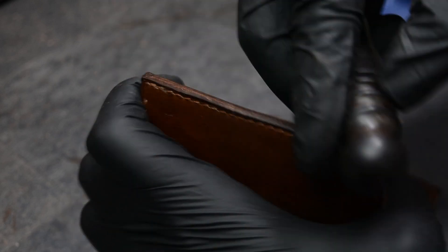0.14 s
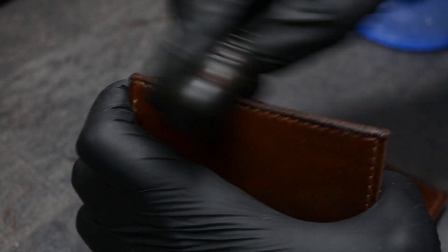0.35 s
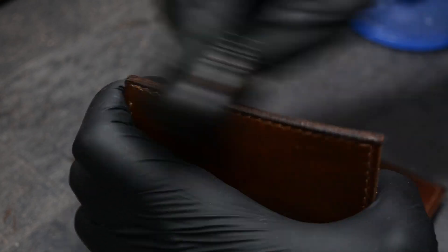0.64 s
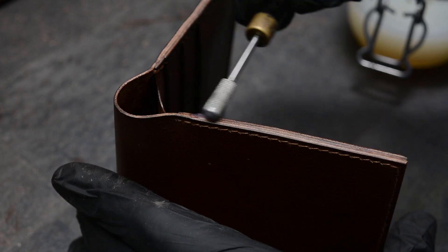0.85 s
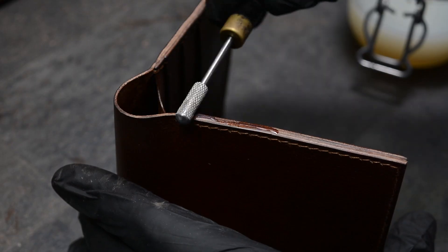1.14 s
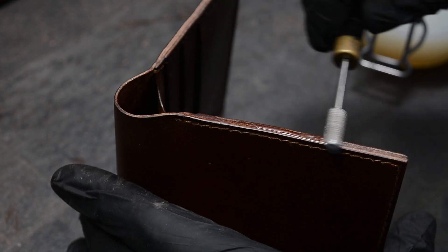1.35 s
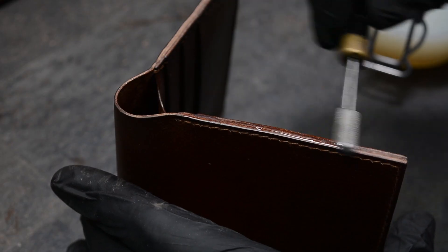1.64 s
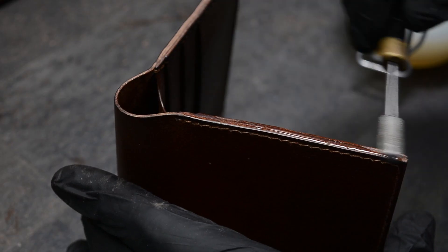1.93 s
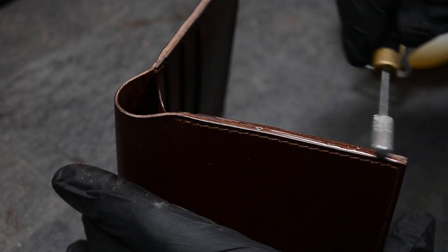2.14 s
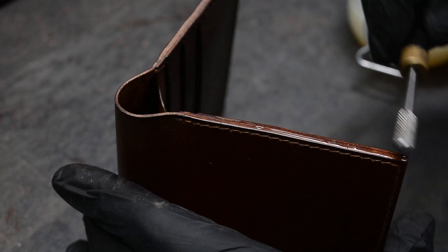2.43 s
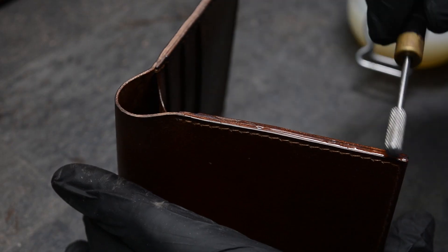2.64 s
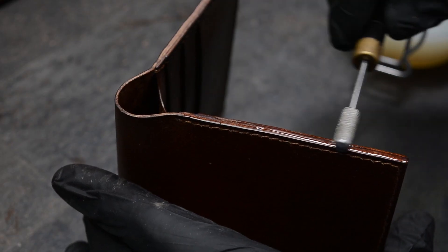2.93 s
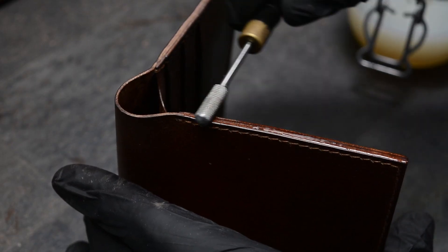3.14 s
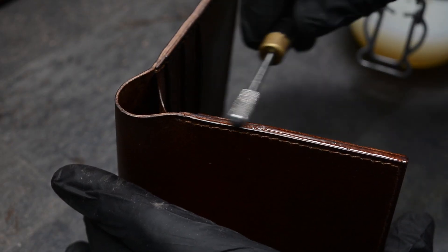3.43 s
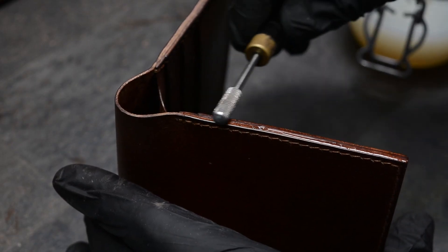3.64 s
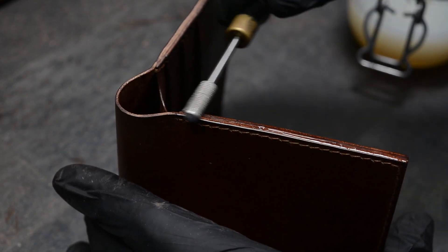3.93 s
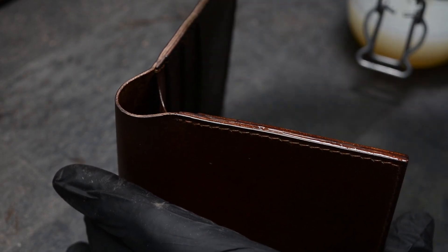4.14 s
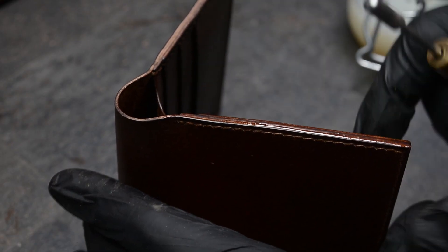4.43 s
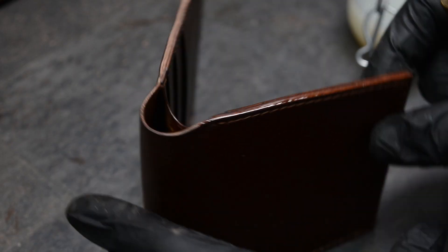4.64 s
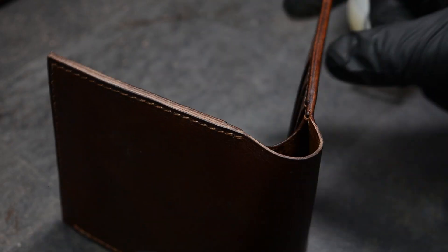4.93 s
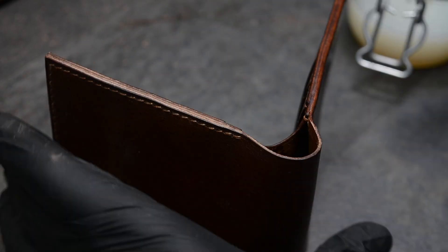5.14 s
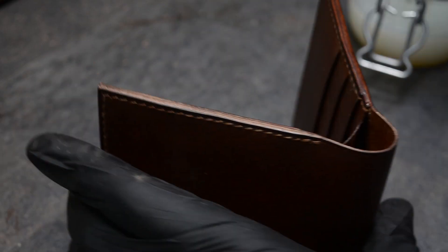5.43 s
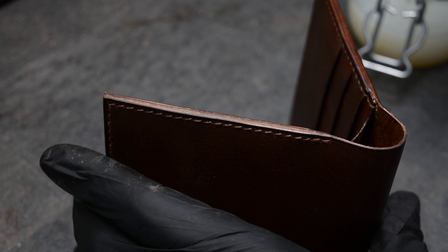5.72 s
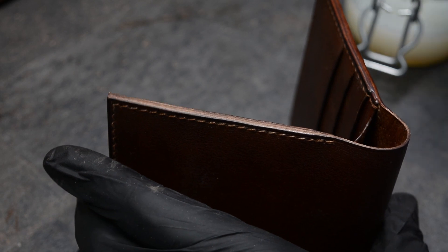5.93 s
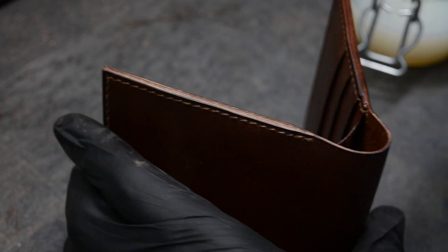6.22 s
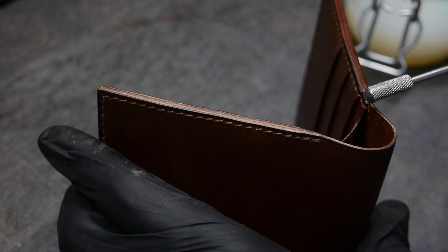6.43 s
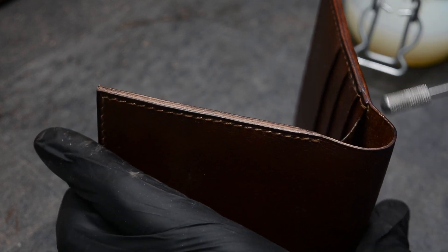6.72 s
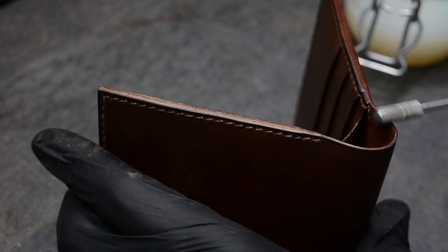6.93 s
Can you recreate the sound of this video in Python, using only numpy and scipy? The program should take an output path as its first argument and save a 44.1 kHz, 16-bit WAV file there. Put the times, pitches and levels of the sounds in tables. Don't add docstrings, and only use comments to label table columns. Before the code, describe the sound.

A wooden tool rubs a leather edge in rapid back-and-forth scratchy strokes, stopping abruptly after less than a second. Low bench thumps and soft taps of a small metal roller follow. Midway the leather is turned with crackly creases, slides and glove creaks. Then two very loud, bright metallic clicks come close together, followed by faint rustling. Close stereo microphones in a quiet, dry room with slight hiss.

```python
import sys
import numpy as np
from scipy import signal
from scipy.fft import rfft, irfft, next_fast_len
from scipy.io import wavfile

SR = 44100
rng = np.random.default_rng(int(sys.argv[2]) if len(sys.argv) > 2 else 0)


def attenuation_scalar(level_db):
    decades = np.asarray(level_db, float) / 20
    return 10 ** decades


def wav_out(sig):
    wavfile.write(sys.argv[1], SR, np.round(np.clip(np.atleast_2d(sig).T, -1, 1) * 32767).astype(np.int16))


N = 312669
TIME = np.arange(N) / SR


def rms_one(x):
    return x / np.sqrt(np.mean(x ** 2) + 1e-20)


def noise():
    return rng.standard_normal((2, N))


def gains(rows):
    s, db = np.transpose(rows)
    return attenuation_scalar(np.interp(TIME, s, db)) * (TIME < s[-1])


def swells(rows):
    coarse = TIME[::32]
    power = 1e-20
    for s, db, rise, fall in rows:
        late = coarse - s
        times_passed = np.where(late < 0, -late / max(rise, .003), late / max(fall, .003))
        power = power + attenuation_scalar(2 * (db - 12 * times_passed))
    return np.interp(TIME, coarse, np.sqrt(power))


def bump_shape(ms, rise_ms, fall_ms):
    return np.exp(-(ms / np.where(ms < 0, rise_ms, fall_ms)) ** 2)


def drift(rate_hz):
    r = np.exp(-2 * np.pi * rate_hz / SR)
    wander = signal.lfilter([1], [1, -2 * r, r * r], rng.standard_normal((2, N + SR)))
    return rms_one(wander[:, SR:])


def coloured(x, spectrum):
    size = next_fast_len(x.shape[-1])
    hz, db = np.transpose(spectrum)
    bins_hz = np.arange(size // 2 + 1) * SR / size
    curve = np.interp(np.log(bins_hz + 1), np.log(hz), db, left=-90, right=-90)
    return irfft(rfft(x, size) * attenuation_scalar(curve), size)[..., :x.shape[-1]]


def resonator(x, hz, r):
    return signal.lfilter([1, 0, -1], [1, -2 * r * np.cos(2 * np.pi * hz / SR), r * r], x)


def resonant(x, peaks):
    out = 0
    for k, (hz, width, db) in enumerate(peaks):
        r = np.exp(-np.pi * max(width, 10) / SR)
        out = out + (-1) ** k * attenuation_scalar(db) * (1 - r) * resonator(x, hz, r)
    return out


def friction(per_s, spread_db):
    sizes = attenuation_scalar(spread_db * np.minimum(rng.exponential(size=(2, N)), 5))
    signs = rng.choice([-1, 1], (2, N))
    return sizes * signs * (rng.random((2, N)) < per_s / SR)


def contact(size, at, rise_ms, fall_ms):
    ms = (np.arange(size) - at) * 1000 / SR
    swell = np.exp(np.where(ms < 0, ms / max(rise_ms, .1), -ms / max(fall_ms, .1)))
    return rng.standard_normal((2, size)) * swell


def peak_one(x):
    return x / np.abs(x).max()


def struck(force, modes):
    out = 0
    for hz, db, t60 in modes:
        soft = signal.lfilter(*signal.butter(1, min(1.5 * hz, .4 * SR), fs=SR), force)
        ring = resonator(soft, hz, attenuation_scalar(-60 / (t60 * SR)))
        strength = attenuation_scalar(db + 2.8 * rng.standard_normal((2, 1)))
        out = out + strength * ring / np.abs(ring).max(axis=1, keepdims=True)
    return peak_one(out)


def add(track, sound, s):
    i = round(s * SR)
    track[:, i:i + sound.shape[1]] += sound[:, :N - i]


def knocks(table, near_db, far_db):
    out = np.zeros((2, N))
    neighbours = ((.65, far_db), (.84, near_db), (1.16, near_db), (1.4, far_db))
    for s, db, hz, blur_ms, t60 in table:
        force = contact(SR // 5, SR // 25, 0.8 * blur_ms, blur_ms)
        others = [(ratio * hz, side_db, .55 * t60) for ratio, side_db in neighbours]
        add(out, attenuation_scalar(db) * struck(force, [(hz, 0, t60)] + others), max(s - .04, 0))
    return out


def room():
    # pitch in Hz, level in dB per Hz.
    tone = [(12, -33), (20, -10), (53, -8.5), (96, -7), (179, -6.5), (289, -5.5), (452, -5.5),
            (4660, -17.5), (14700, -22), (16500, -21)]
    level_db = -60
    return attenuation_scalar(level_db + 2.5 + .5 * drift(3)) * rms_one(coloured(noise(), tone))


def slicker():
    # time in seconds, level of the leather in dB.
    strokes = [
        (0.0, -59),
        (0.33, -60),
        (0.494, -57),
        (0.588, -57.5),
        (0.708, -54.5),
        (0.78, -68),
    ]
    # pitch in Hz, width in Hz, level in dB.
    wallet = [(700, 770, -8.5), (1270, 430, -5), (1640, 210, -2), (2400, 700, -10), (3200, 850, -13)]
    # pitch in Hz, level in dB per Hz.
    scratch_tone = [(2000, -7), (3000, -0.5), (5000, -2), (8000, -3.5), (12000, -6), (16000, -17)]
    # time in seconds, level in dB.
    swishes = [(.0, -61), (.052, -55), (.135, -52), (.21, -51.5), (.29, -55.5), (.36, -52.5), (.44, -57),
               (.52, -50), (.60, -54), (.668, -45.5), (.722, -42)]
    # time in seconds, peak in dB, pitch in Hz.
    turns = [(0.0094, -45, 1540), (0.0444, -54, 1670), (0.0997, -35.5, 1670), (0.1388, -40, 1720),
             (0.1994, -53.5, 1750), (0.251, -42.5, 1420), (0.2855, -39, 1300), (0.3336, -47, 1630),
             (0.385, -52, 1730), (0.4402, -35, 1705), (0.485, -43.5, 1540), (0.5294, -57, 1400),
             (0.6, -44.5, 1520), (0.6444, -51, 1740), (0.6931, -43, 1680)]

    pressure = gains(strokes)
    body = attenuation_scalar(-0.5 + 3.2 * drift(35)) * pressure * rms_one(resonant(friction(5000, spread_db=3.2), wallet))

    scratch_gain = pressure * attenuation_scalar(-8.5)
    for s, db in swishes:
        scratch_gain = scratch_gain + attenuation_scalar(db - 10.0) * bump_shape((TIME - s) * 1000, rise_ms=14.0, fall_ms=12.0)
    grit = rms_one(coloured(friction(9000, spread_db=3.0), scratch_tone))
    scratch = attenuation_scalar(-2.0) * scratch_gain * attenuation_scalar(3.1 * drift(30)) * grit

    blows = [(s, db, hz, 4.3 + .08 * (db + 45), .036) for s, db, hz in turns]
    turning = np.roll(knocks(blows, near_db=-7.5, far_db=-17.0), round(.003 * SR), axis=1)
    return body + scratch + turning


def bench():
    # pitch in Hz, width in Hz, level in dB.
    top_modes = [(145, 46, -2), (178, 48, 0), (215, 62, -5)]
    # time in seconds, level in dB, dying time in seconds.
    top_jolts = [(0.0, -60, .3), (.5, -60, .25), (.72, -59, .12), (.94, -59, .1), (1.3, -63, .3),
                 (1.66, -56, .08), (1.92, -58, .16), (2.2, -58, .1), (2.39, -60, .05), (2.53, -49.5, .05),
                 (2.69, -55, .05), (2.865, -54, .17), (3.16, -61, .15), (3.47, -56, .12), (3.83, -56, .05),
                 (4.03, -61, .05), (4.7, -54, .07), (4.82, -60, .08), (5.4, -63, .3), (6.69, -62, .08),
                 (7.07, -61, .1)]
    # time in seconds, level in dB, dying time in seconds.
    frame_jolts = [(.08, -57.5, .6), (.6, -63, .3), (1.38, -61, .08), (1.62, -58, .05), (1.78, -63, .04),
                   (2.07, -58, .12), (2.41, -63, .08), (3.69, -57, .05), (3.78, -55, .03), (4.11, -54, .05),
                   (4.35, -60, .07), (4.7, -58, .04), (5.03, -57, .05), (5.6, -66, .8), (6.68, -62, .07),
                   (7.03, -57, .04)]

    top_swell = swells([(s, db, .05, fall) for s, db, fall in top_jolts])
    frame_swell = swells([(s, db, .07, fall) for s, db, fall in frame_jolts])
    top = np.hypot(attenuation_scalar(-67.5), attenuation_scalar(-4.5) * top_swell)
    frame = np.hypot(attenuation_scalar(-74), frame_swell)
    hum = rms_one(resonant(noise(), top_modes))
    rumble = rms_one(coloured(noise(), [(18, -17), (40, 3.5), (70, -2), (120, -6)]))
    return attenuation_scalar(-1.0) * top * hum + attenuation_scalar(-4.0) * frame * rumble


def creases():
    # time in seconds, level in dB, pitch in Hz.
    folds = [(.905, -52, 1500), (1.25, -54, 1500), (1.29, -52, 1500), (1.35, -55, 1400), (2.21, -51, 2700),
             (2.218, -50, 1100), (2.248, -50, 1100), (3.6, -54, 1200), (4.656, -47, 1380),
             (4.683, -47, 990), (4.695, -43, 1320), (4.707, -44, 1350), (4.715, -46, 990),
             (4.729, -48, 940), (4.748, -47, 1740), (4.756, -53, 3910), (4.76, -50, 2200),
             (4.773, -43, 1160), (4.775, -48, 2260), (4.782, -44, 520), (4.785, -45, 1350),
             (4.802, -45, 1160), (4.806, -50, 2810), (4.813, -44, 550), (4.831, -48, 1740),
             (4.837, -47, 1240), (4.925, -53, 3200), (4.961, -47, 2500), (4.964, -47, 3970),
             (4.972, -52, 3220), (5.01, -54, 2800), (5.137, -54, 5200), (5.192, -56, 4500)]
    # time in seconds, level in dB, pitch in Hz.
    catches = [(.005, -52, 3200), (.145, -52, 2650), (.196, -52, 3300), (.254, -47, 2250),
               (.287, -47, 2240), (.308, -49, 2200), (.34, -49, 2650), (.451, -49, 2170), (.526, -55, 6430),
               (.531, -56, 4670), (.6, -55, 4500), (.655, -55, 6280), (.681, -51, 6210), (.724, -48, 5100)]
    blur_ms, t60_s = 2.2, .02
    snaps = [(s, db, hz, blur_ms, t60_s) for s, db, hz in folds + catches]
    return attenuation_scalar(4.5) * knocks(snaps, near_db=-10.0, far_db=-17.0)


def thumps():
    # time in seconds, left level in dB, pitch in Hz.
    in_step = [(.021, -57, 147), (.712, -54, 143), (.94, -58, 220), (1.624, -54, 224), (1.692, -55, 176),
               (1.696, -60, 279), (1.929, -53, 176), (2.188, -53, 217), (2.523, -49, 176),
               (2.693, -54, 180), (2.68, -63, 279), (2.875, -48, 176), (2.981, -50, 173), (3.168, -54, 169),
               (3.27, -58, 195), (3.477, -55, 228), (3.498, -53, 173), (3.647, -56, 125), (3.736, -59, 224),
               (3.825, -52, 125), (4.03, -58, 140), (4.23, -58, 192), (4.681, -50, 180), (4.94, -59, 170),
               (7.03, -57, 146)]
    # time in seconds, left level in dB, pitch in Hz.
    heaves = [(.153, -58, 50), (.232, -58, 55), (.334, -58, 41), (.59, -58, 55), (1.36, -58, 50),
              (1.45, -60, 75), (1.66, -58, 60), (2.06, -58, 65), (2.15, -59, 60), (2.4, -59, 60),
              (3.0, -60, 70), (3.55, -57, 125), (3.776, -57, 55), (4.121, -57, 80), (4.342, -58, 41),
              (4.7, -58, 60), (5.03, -57, 60), (6.009, -60, 35), (6.695, -58, 36), (7.02, -59, 50)]
    # time in seconds, left level in dB, pitch in Hz.
    opposed = [(.187, -60, 110), (.555, -54, 143), (.903, -46, 173), (1.259, -46, 176), (1.29, -60, 270),
               (2.15, -52, 176), (2.26, -54, 176), (2.37, -61, 283), (2.387, -49, 173), (2.93, -54, 176),
               (3.727, -56, 176), (4.817, -56, 118), (4.834, -52, 180), (5.173, -60, 220),
               (5.267, -55, 180)]
    # pitch in Hz, level in dB.
    right = [(60, -1), (120, -3), (176, -5), (225, -4), (280, 4)]

    out = np.zeros((2, N))
    ms = np.arange(-SR // 10, SR // 10) * 1000 / SR
    swell = bump_shape(ms, rise_ms=18.0, fall_ms=23.0)
    right_hz, right_db = np.transpose(right)
    for table, sign in ((in_step + heaves, 1), (opposed, -1)):
        for s, db, hz in table:
            note = attenuation_scalar(db + 2.5) * swell * np.sin(2 * np.pi * hz * ms / 1000)
            early = max(round((.1 - s) * SR), 0)
            sides = [1, sign * attenuation_scalar(np.interp(hz, right_hz, right_db))]
            add(out, np.outer(sides, note[early:]), max(s - .1, 0))
    return out


def hands():
    # peak in seconds, level in dB, swelling and dying times in seconds.
    slides = [(.95, -60, .1, .04), (1.158, -60, .02, .015), (1.25, -61, .04, .25), (1.658, -58.5, .03, .03),
              (3.984, -68, .08, .4), (4.32, -63, .04, .13), (4.685, -57, .07, .2), (4.785, -49.5, .18, .17),
              (5.258, -58, .01, .08), (5.48, -59, .4, .05), (5.95, -64, .03, .2), (6.14, -58.5, .3, .05),
              (6.282, -59, .12, .05), (6.676, -63, .01, .05)]
    # peak in seconds, creak in dB, hiss in dB, swelling and dying times in seconds.
    rustles = [(1.654, -68, -75, .015, .06), (3.24, -63, -68, .015, .02), (4.18, -68, -66, .1, .1),
               (4.29, -61, -66, .04, .1), (4.344, -56, -55, .06, .03), (4.68, -64, -62, .12, .3),
               (4.79, -57, -64, .15, .12), (4.968, -56, -62, .07, .08), (5.05, -72, -61, .15, .05),
               (5.218, -61, -62, .2, .03), (5.44, -68.5, -68, .4, .08), (5.74, -70, -56, .02, .01),
               (5.97, -67, -66, .03, .08), (6.09, -66, -59, .12, .17), (6.334, -68, -71.5, .04, .2)]
    # pitch in Hz, level in dB per Hz.
    slide_tone = [(200, -10), (300, -5), (520, -3), (750, -7.5), (1050, -1), (1500, -2), (2200, -9),
                  (3000, -21.5), (4500, -31)]
    # pitch in Hz, level in dB per Hz.
    creak_tone = [(1500, -12.5), (2200, -3), (2800, 0.5), (3800, -2), (5000, -5.5), (7000, -22)]
    # pitch in Hz, level in dB per Hz.
    hiss_tone = [(3500, -16), (5500, 0), (8000, -1), (11000, 0), (14000, -6.5), (16000, -9)]

    creak_gain = swells([(s, db, rise, fall) for s, db, _, rise, fall in rustles])
    hiss_gain = swells([(s, db, rise, fall) for s, _, db, rise, fall in rustles])
    slide = rms_one(coloured(friction(5500, spread_db=3.3), slide_tone))
    creak = rms_one(coloured(friction(8000, spread_db=2.5), creak_tone))
    hiss = rms_one(coloured(friction(14000, spread_db=4.5), hiss_tone))
    slide = swells(slides) * attenuation_scalar(2.0 * drift(15.5)) * slide
    creak = creak_gain * attenuation_scalar(3.7 * drift(36.3)) * creak
    hiss = hiss_gain * attenuation_scalar(1.8 * drift(30)) * hiss
    return attenuation_scalar(-2.0) * slide + attenuation_scalar(-3.0) * creak + attenuation_scalar(-3.0) * hiss


def taps():
    # time in seconds, then thud, leather, shaft and knurl peaks in dB.
    hits = [(1.66, -53, -60.5, -69.5, -72.5), (2.121, -55.5, -48, -44.5, -46), (2.233, -56, -45, -60, -54),
            (2.363, -48, -43, -43, -46), (2.512, -44.5, -41.5, -40.5, -44),
            (2.674, -58, -45.5, -46.5, -50.5), (3.383, -62, -49.5, -49, -49.5), (3.729, -53, -59, -66, -64),
            (4.957, -63, -53, -54, -65), (5.204, -72.5, -70.5, -58.5, -60),
            (5.253, -59.5, -53, -71.5, -64.5)]
    # pitch in Hz, level in dB, seconds to fade 60 dB.
    thud = [(180, -6, 0.047), (290, 1.5, .07), (500, 11, 0.017)]
    # pitch in Hz, level in dB, seconds to fade 60 dB.
    leather = [(675, -1, 0.0071), (976, -1.5, 0.035), (1200, 4, 0.011), (1627, -2.5, 0.042)]
    # pitch in Hz, level in dB, seconds to fade 60 dB.
    shaft = [(2230, -1, 0.1), (2160, 9, .02), (2390, 3.5, 0.01), (3040, -8.5, 0.04), (3760, -4, .01)]
    # pitch in Hz, level in dB, seconds to fade 60 dB.
    knurl = [(4500, 0, 0.007), (5500, 1, 0.015), (5890, 3, 0.029), (6480, 4, .01), (7100, -30, .008),
             (10270, -5, 0.008)]
    slap_tone = [(300, -20), (700, 0), (3000, -3), (4300, -9), (6200, -4), (8000, -11), (10400, -12), (13000, -24)]

    out = np.zeros((2, N))
    for s, *parts_db in hits:
        force = contact(SR // 5, SR // 40, rise_ms=5.0, fall_ms=4.8)
        slap = peak_one(coloured(force, slap_tone))
        add(out, attenuation_scalar(max(parts_db[1:]) - 1.5) * slap, s - .021)
        for part_db, modes, trim_db in zip(parts_db, (thud, leather, shaft, knurl), (2.7, 4.9, 3.8, 2.2)):
            held = [(hz * (1 + .012 * rng.standard_normal()), *rest) for hz, *rest in modes]
            add(out, attenuation_scalar(part_db + trim_db) * struck(force, held), s - .021)
    return out


def lingers():
    # time in seconds, level in dB, pitch in Hz, blur in ms, seconds to fade 60 dB.
    notes_left = [(2.126, -41, 2230, 2.0, .03), (2.137, -45, 2230, 1.5, .03), (2.147, -51, 2230, 1.5, .03),
                  (2.158, -54, 2230, 2.0, .03), (2.236, -52, 3000, 3.0, .03), (3.389, -47, 3000, 3.0, .02),
                  (5.757, -32, 430, 5.0, .08), (5.755, -23, 2390, 3.0, .05), (5.81, -46, 2240, 6.0, .08),
                  (5.8, -46, 5010, 8.0, .06), (5.78, -34, 11290, 8.0, .08), (5.76, -36, 14900, 6.0, .08),
                  (5.8545, -17.5, 11300, 1.5, .03), (5.858, -25, 8540, 2.5, .06),
                  (5.885, -35, 11280, 9.0, .09), (5.875, -29, 6815, 7.0, .08), (5.862, -31, 2907, 3.0, .05),
                  (5.856, -36, 14800, 6.0, .09)]
    return knocks(notes_left, near_db=-22.0, far_db=-32.0)


def hollows():
    # time in seconds, level in dB, pitch in Hz, blur in ms, seconds to fade 60 dB.
    hollow_notes = [(5.7505, -27, 1500, 1.2, .03), (5.752, -31.5, 480, 3.5, .08), (5.768, -36, 500, 6, .07),
                    (5.758, -20.5, 2320, 1.8, .04), (5.768, -26, 2240, 5.0, .065),
                    (5.755, -9, 6805, 3.5, .06), (5.859, -13, 6815, 2.0, .06), (5.858, -17, 3400, 1.8, .05),
                    (5.859, -25.5, 2400, 2.0, .04), (5.874, -25, 2410, 2.8, .04),
                    (5.858, -35.5, 457, 3.0, .06), (5.879, -32, 500, 5.2, .07), (5.893, -33, 434, 6.4, .07),
                    (5.885, -43, 340, 6.0, .07), (2.8625, -34.5, 2200, 4.0, .06)]
    return knocks(hollow_notes, near_db=-16.0, far_db=-29.0)


def bumps():
    # time in seconds, level in dB, pitch in Hz, blur in ms, seconds to fade 60 dB.
    blows = [(4.292, -43, 2700, 9.0, .025), (4.963, -43, 3900, 2.5, .006), (5.262, -46, 1100, 5.0, .012),
             (3.478, -43, 1600, 7.7, .02), (3.8135, -38.5, 3100, 3.0, .004), (3.815, -40, 1200, 4.6, 0.011),
             (3.828, -42, 1500, 9.0, .01), (3.815, -32, 290, 2.9, 0.068), (3.816, -33, 550, 5.5, .03),
             (3.829, -41, 180, 3.9, 0.074)]
    return knocks(blows, near_db=-13.0, far_db=-14.0)


def rattle(contacts, modes, crack_tone, ring_db, crack_db, tail_db, t60):
    start, size = contacts[0][0] - .04, SR // 4
    force = sum(attenuation_scalar(db) * contact(size, (s - start) * SR, rise, fall) for s, db, rise, fall in contacts)
    damped = [(hz, db, min(0.19 * decay, .05)) for hz, db, decay in modes]
    crack = peak_one(coloured(force, crack_tone))
    direct = attenuation_scalar(ring_db) * struck(force, damped) + attenuation_scalar(crack_db) * crack
    echoes = rng.standard_normal((2, size)) * attenuation_scalar(-60 * TIME[:size] / t60)
    echoes = echoes / np.sqrt(np.sum(echoes ** 2))
    tail = signal.fftconvolve(direct, echoes, axes=1)[:, :size]
    out = np.zeros((2, N))
    add(out, (direct + attenuation_scalar(tail_db) * tail) * attenuation_scalar([[0], [-2.2]]), start)
    return out


def clasp():
    # time in seconds, level in dB, rise in ms, fall in ms.
    contacts_one = [(5.7497, -7, 1.6, 1.6), (5.7535, 0, 2.5, 1.5), (5.757, -4, 1.8, 2.5),
                    (5.764, -7.5, 1.4, 2.5), (5.768, -16, 1.3, 2.5), (5.778, -30, 3.6, 6.0)]
    contacts_two = [(5.8515, -14.5, 3.2, 1.2), (5.8545, -6, 1.5, 2.2), (5.8585, 0.5, 1.5, 1.8),
                    (5.867, -16, 2.5, 3.0), (5.877, -23.5, 3.0, 6.0)]
    # pitch in Hz, level in dB, seconds to fade 60 dB.
    ring_one = [(517, -30, 0.13), (2250, -24, 0.2), (2902, -29, 0.15), (3535, -25, 0.075),
                (3895, -20.5, 0.044), (6072, -15.5, 0.11), (6800, 1.5, 0.08), (8037, -24, 0.081),
                (8204, -28.5, 0.11), (8489, -10.5, 0.041), (8861, -18.5, 0.07), (10720, -15, 0.073),
                (11270, -1.5, 0.063), (11470, -7.5, 0.066), (11630, -11.5, 0.055), (12610, -19.5, 0.084),
                (13330, -34.5, 0.085), (14580, -30.5, 0.089)]
    ring_two = [(498, -31, 0.26), (2400, -11, 0.072), (2907, -25, 0.11), (3340, -13.5, 0.13),
                (4270, -23, 0.11), (4877, -28, 0.074), (5070, -21, 0.11), (5986, -2, 0.08),
                (6800, 4.5, 0.08), (8160, -14, 0.05), (9329, -12.5, 0.053), (10800, -20.5, 0.061),
                (11220, -2, 0.079), (11280, -9.5, 0.1), (11440, -5, 0.047), (11730, -8.5, 0.078),
                (12870, -29.5, 0.11), (14810, -29, 0.11)]
    # pitch in Hz, level in dB per Hz.
    crack_one = [(350, -55.5), (600, -26.5), (1680, -27), (2400, -13), (4340, -21), (5330, -1), (5950, -11),
                 (6640, -4), (9490, -21.5), (11500, -5), (13600, -31), (16000, -28)]
    crack_two = [(350, -59.5), (600, -31.5), (1570, -31), (2240, -17), (3120, -26), (3390, -11),
                 (4580, -22), (6200, 0), (7310, -10.5), (9620, -21), (11300, -10), (13400, -36),
                 (16000, -40)]
    first = rattle(contacts_one, ring_one, crack_one, ring_db=-1.5, crack_db=-3.5, tail_db=-5.0, t60=.1)
    second = rattle(contacts_two, ring_two, crack_two, ring_db=-2.0, crack_db=-0.8, tail_db=-5.5, t60=0.092)
    return first + second


def scene():
    near = attenuation_scalar(4.5) * (slicker() + bench() + hands() + taps()) * attenuation_scalar([[.7], [-.7]])
    floor = room() * attenuation_scalar([[.3], [-.3]])
    return floor + near + creases() + thumps() + lingers() + hollows() + bumps() + clasp()


def roll_off(x):
    return signal.sosfilt(signal.butter(12, 16820, fs=SR, output="sos"), x)


def record(dry):
    finished = coloured(np.clip(dry, -1, 1), [(5, 0), (15850, 0)])
    return roll_off(finished)


dry = scene()
out = record(dry)
wav_out(out)
```